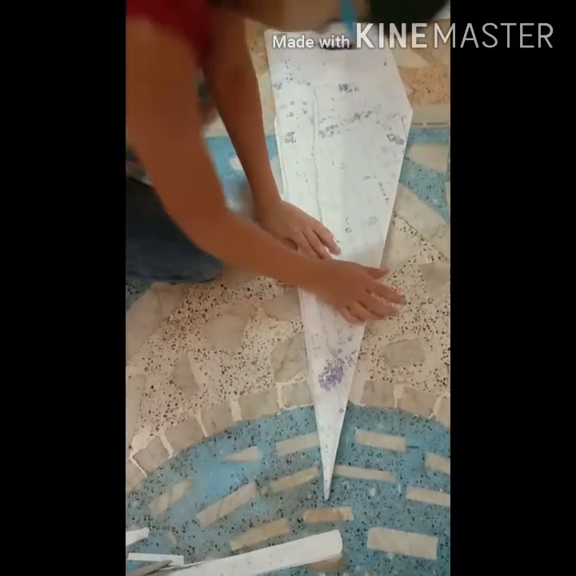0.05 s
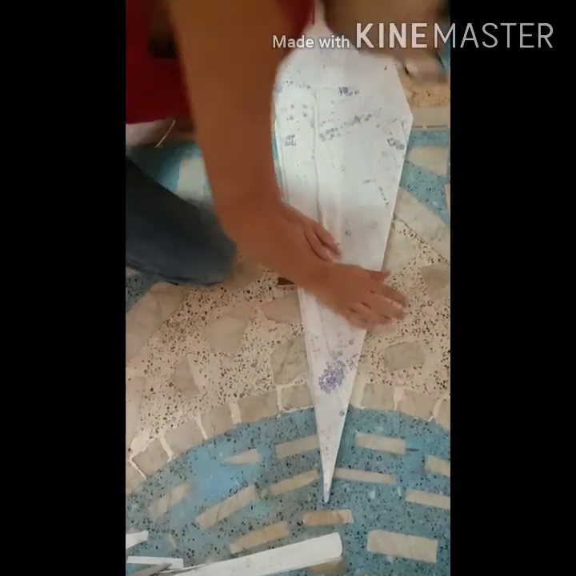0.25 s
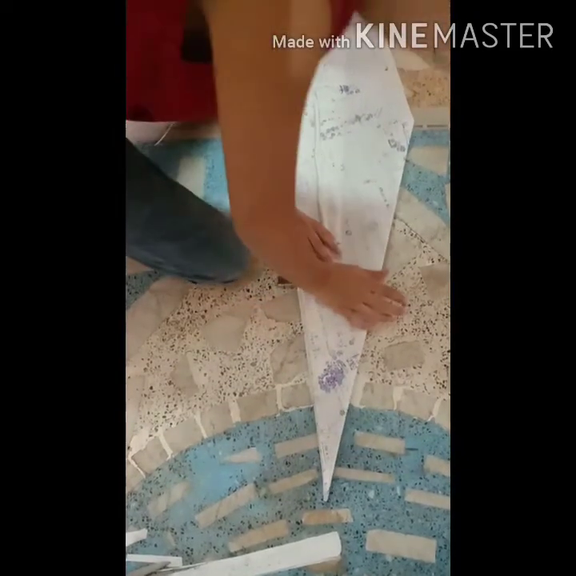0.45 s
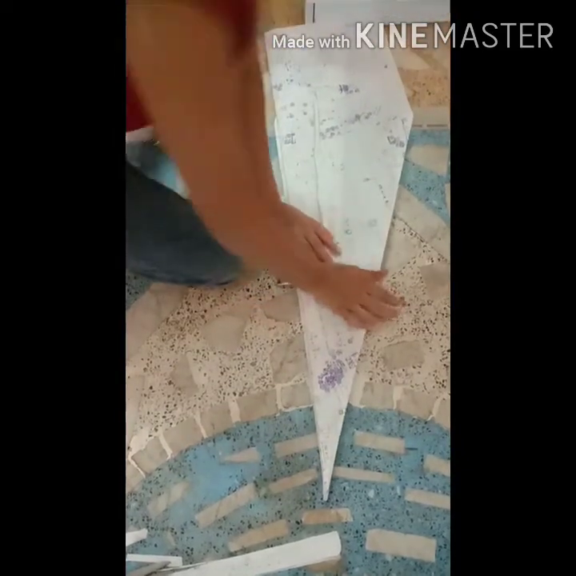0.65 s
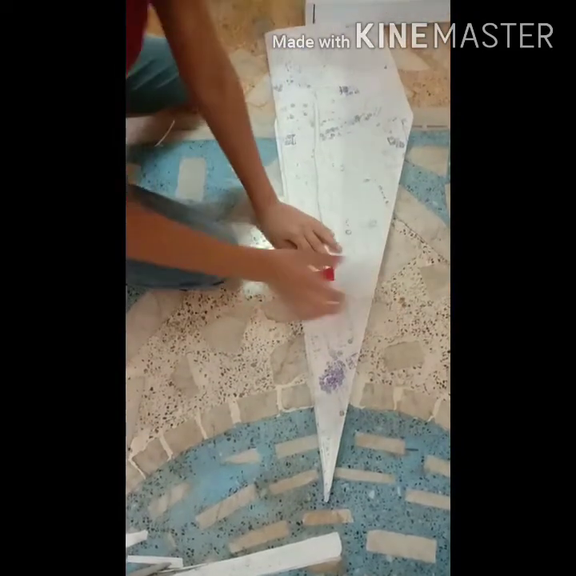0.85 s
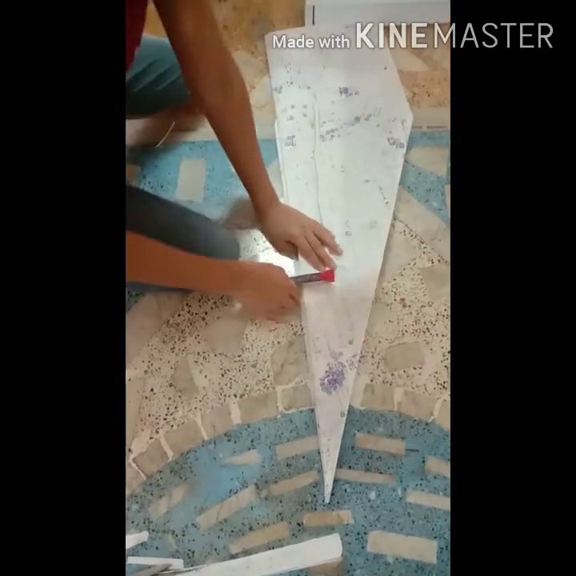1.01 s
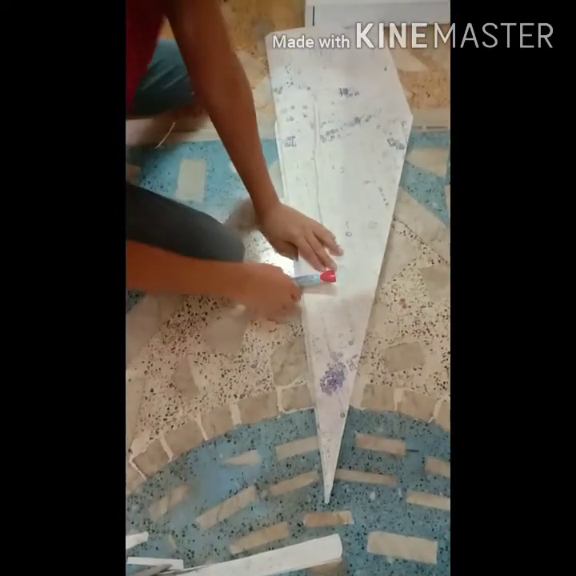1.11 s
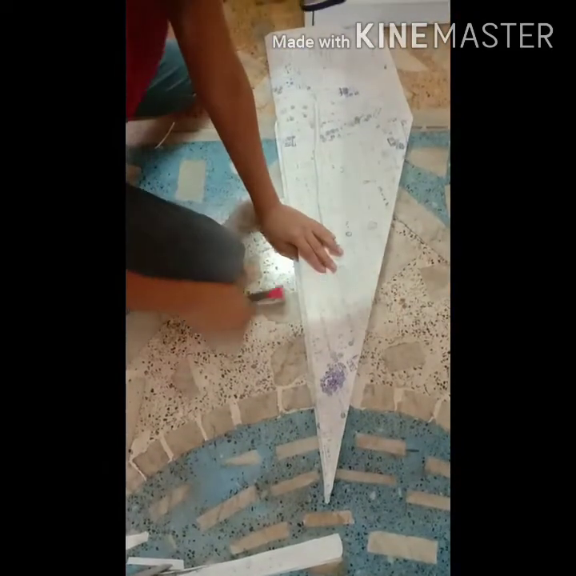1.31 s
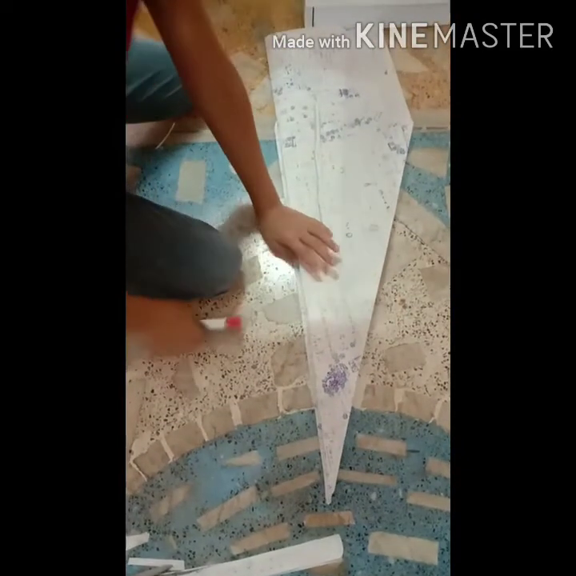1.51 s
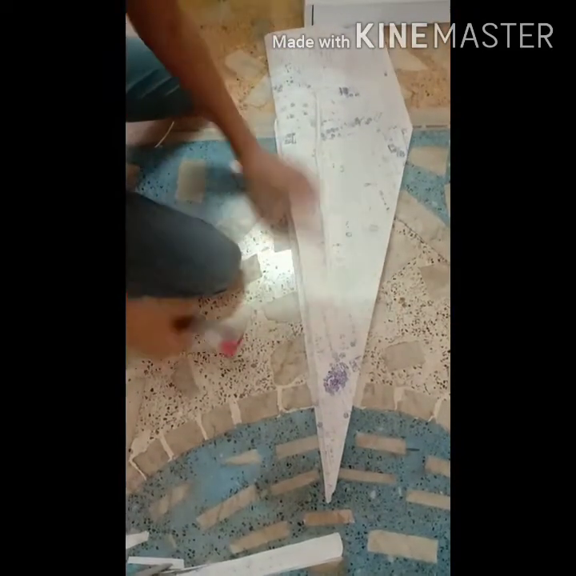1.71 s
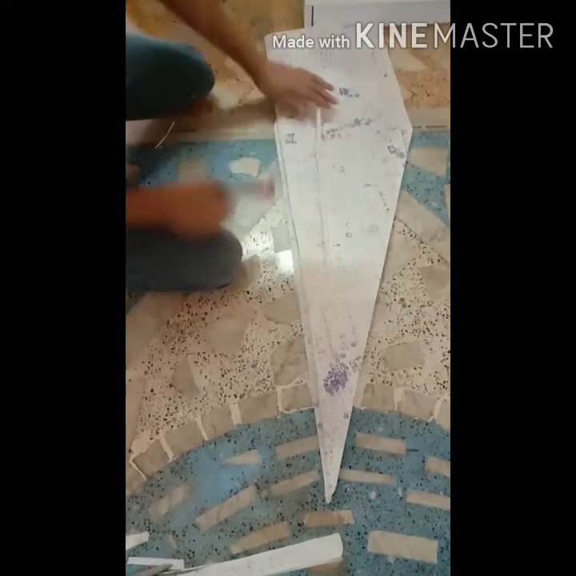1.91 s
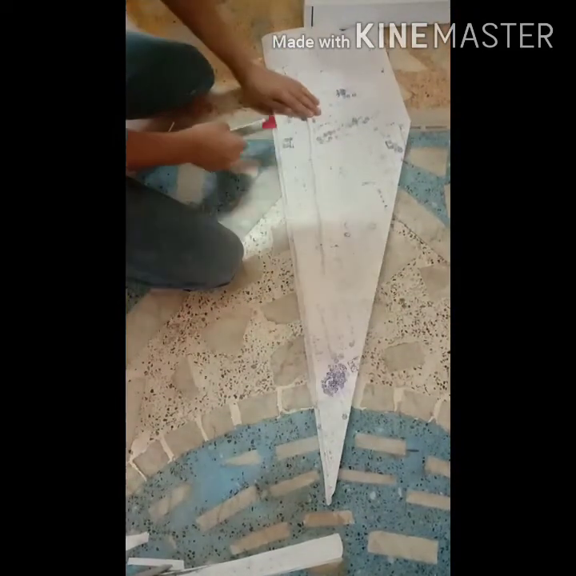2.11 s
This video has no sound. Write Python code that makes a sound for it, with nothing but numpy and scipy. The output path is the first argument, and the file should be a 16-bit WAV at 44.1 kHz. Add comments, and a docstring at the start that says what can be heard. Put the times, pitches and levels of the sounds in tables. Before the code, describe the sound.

A small hand stapler on a hard floor, close, mono, in a small boomy room. Faint dull bumps of hands and knees run throughout. At 0.2 s one loud cracking clack through paper with a low boom; lever clicks and drag from 0.3 to 0.5 s; click and scrape near 0.8; clicks at 1.2; bright ringing steel snaps at 1.36, sliding until 1.6; near quiet, then faint click and paper rub around 2.05.

```python
"""A small hand stapler on a hard floor in a small boomy room, heard at one microphone, same in both channels.
Over still air and dull bumps of hands and knees, it clacks shut once through paper: cracks over a low boom.
The lever drags and eases up with soft clicks; then the stapler scrapes off the paper, tiny slips of friction.
It springs open: bright snaps set the steel ringing, and sliding and a last rub of paper follow.
A noise suppressor pulls the quiet moments down."""
import sys
import numpy as np
from scipy import signal
from scipy.fft import rfft, irfft
from scipy.io import wavfile
from scipy.ndimage import uniform_filter1d

SR = 44100
rng = np.random.default_rng(int(sys.argv[2]) if len(sys.argv) > 2 else 0)


def wav_out(sig):
    """Save sig, one row per channel (or a flat mono array), as 16-bit PCM at SR to the path in sys.argv[1]."""
    wavfile.write(sys.argv[1], SR, np.round(np.clip(np.atleast_2d(sig).T, -1, 1) * 32767).astype(np.int16))


N = 94815  # samples, 2.15 s

# Every *_COLOUR table is a relative spectrum, scaled to energy 1 before its level is set.

# still air of the room: pitch_hz, relative level_db per Hz
AIR_COLOUR = [(20, -35.5), (40, -27.5), (60, -16), (120, -0.5), (170, -5.5), (260, -14.5), (480, -22.5),
              (600, -20), (750, -21), (1050, -25), (1270, -19.5), (1500, -29), (3000, -36), (5300, -35),
              (6500, -60), (10000, -46), (15500, -43), (17000, -58.5)]
AIR_DB = -61

# how long the room holds each band: pitch_hz, t60_s
ROOM_DECAY = [(100, 0.63), (400, .36), (1300, 0.31), (4000, 0.29), (8000, 0.27), (15000, .25)]
ROOM_GAP_S = 0.001  # silence before the first reflection
REFLECTION_DENSITY = 0.15  # share of samples that hold a reflection

# dull bumps of hands and knees on the floor: start_s, level_db, pitch_hz
FLOOR_BUMPS = [(0, -40.5, 142), (0.071, -46.5, 128), (0.134, -46.5, 134.5), (0.183, -42, 128),
               (.288, -35.5, 105.4), (.318, -37.5, 102.6), (0.412, -44.5, 99.6), (0.441, -44.5, 108.7),
               (0.476, -53, 146), (0.544, -51, 130.5), (.668, -53, 126.5), (0.788, -45.5, 117.3),
               (0.877, -50.5, 130), (0.934, -51, 110), (1.041, -53, 125), (1.108, -50.5, 127.6),
               (1.235, -56, 123), (1.283, -53, 128.6), (1.355, -50, 127), (1.414, -48.5, 111.4),
               (1.476, -53.5, 232), (1.499, -58, 127.6), (1.608, -58, 128), (1.707, -55, 123),
               (1.87, -48.5, 133.5), (1.92, -47.5, 114), (1.961, -54, 150.7), (2.004, -58, 132.5),
               (2.106, -62, 114)]
BUMP_RISE_S, BUMP_T60_S = 0.02, 0.16

# paper rubbing under the stapler and hands: time_s, level_db
PAPER_LEVEL = [(0, -73), (.39, -70.5), (.63, -80.5), (.74, -70.5), (.8, -55.5), (.83, -55), (.87, -60.5),
               (.92, -80.5), (.96, -83), (1.0, -85), (1.19, -70.5), (1.235, -53), (1.28, -63.5),
               (1.64, -87), (1.86, -81.5), (1.94, -69), (2.01, -69.5), (2.065, -55), (2.1, -71),
               (2.15, -59.5)]
# tone of the paper: pitch_hz, relative level_db per Hz
PAPER_COLOUR = [(100, -11), (400, -5), (650, 1), (1050, -7.5), (1270, 7.5), (1500, -2), (2200, -2.5),
                (3800, -7.5), (6000, -13.5), (9000, -14), (13000, -18.5), (15300, -26), (17000, -51.5)]
# steel sliding on steel: time_s, level_db
STEEL_SLIDE_LEVEL = [(.74, -76), (.752, -57.5), (.82, -50), (.92, -71.5), (1.19, -75.5), (1.24, -59),
                     (1.29, -68.5), (1.312, -63), (1.336, -52), (1.352, -62.5), (1.41, -56), (1.45, -48),
                     (1.5, -50.5), (1.528, -54.5), (1.555, -53.5), (1.59, -51.5), (1.65, -73.5)]
# tone of the sliding steel: pitch_hz, relative level_db per Hz
STEEL_SLIDE_COLOUR = [(50, -27.5), (230, 0), (400, -19), (600, -11.5), (1000, -14.5), (1270, -3.5),
                      (2000, -6), (2750, -0.5), (3100, -4), (3550, 3.5), (4400, -4), (5200, 1), (6400, -10),
                      (7300, -4.5), (8200, -16.5), (9000, -10.5), (10000, -18), (12500, -24.5),
                      (15300, -23), (17000, -43.5)]
# the lever dragging on its guide as it rises after the blow: time_s, level_db
LEVER_DRAG_LEVEL = [(.385, -99), (.405, -59), (.42, -49.5), (.455, -54.5), (.485, -60.5), (.51, -58.5),
                    (.55, -63), (.68, -65), (.76, -84)]
# tone of the dragging lever: pitch_hz, relative level_db per Hz
LEVER_DRAG_COLOUR = [(100, -16), (900, -8), (1270, 7.5), (1700, -2), (2600, -2.5), (3700, -1), (5400, -9),
                     (8000, -33), (15000, -38.5), (17000, -55)]
# unevenness of the slips, in dB
PAPER_SPREAD_DB, SLIDE_SPREAD_DB, DRAG_SPREAD_DB = 1.5, 4.5, 3
SLIPS_PER_S, FRICTION_ROOM_DB = 9000, -2
SLIP_HZ = np.arange(200, 15600, 270)  # pitches at which the tiny slips ring
SLIP_T60_S = 0.012

# soft clicks of the lever and plastic shell:
# start_s, level_db, tilt_db per octave, resonance_hz, resonance_db
LEVER_CLICKS = [(0.33, -26.5, 3.5, 4240, 14), (0.414, -25.5, -0.5, 2700, 10), (0.477, -30.5, -20, 1250, 22),
                (0.4902, -24.5, -1.5, 2010, 2), (0.4945, -18.5, -1, 1930, 8), (.6585, -36.5, -9, 1500, 8),
                (0.7184, -32.5, -11, 1550, 20), (0.746, -31.5, 3.5, 4060, 7), (0.7869, -18, 7, 5650, 2.5),
                (0.7876, -27, 1, 1300, 2), (.821, -24, 6.5, 1250, 9.5), (1.209, -27, 2, 2000, 21),
                (1.216, -26.5, 0, 1950, 14), (1.2215, -18.5, 9.5, 2100, 26.5), (1.31, -37.5, 4, 4160, 15),
                (1.5334, -27, 2.5, 2806, 20.5), (2.028, -37, -2.5, 1250, 23), (2.0472, -30, 2.5, 1280, 17),
                (2.064, -52, 0, 1290, 20)]
# tone of the clicks: pitch_hz, relative level_db per Hz
LEVER_CLICK_COLOUR = [(60, 4.5), (400, -15.5), (900, -10.5), (1250, 13), (1700, 2), (3700, -2.5),
                      (6000, -7.5), (9000, -14.5), (13000, -24), (15300, -32), (17000, -51)]
CLICK_CHATTER_T60_S, CLICK_ROOM_DB = 0.039, -6

# the steel magazine snapping free and rattling: start_s, level_db, ring_db (against the snap)
MAGAZINE_SNAPS = [(1.3565, -12.5, -15), (1.3612, -12, -3), (1.3647, -15, -22), (1.3663, -14, -0.5),
                  (1.3666, -17, 2.5), (1.4563, -18, -23), (1.5321, -24.5, -10)]
# tone of the snaps: pitch_hz, relative level_db per Hz
MAGAZINE_SNAP_COLOUR = [(40, -29), (120, 12), (250, -9.5), (550, -3), (950, -24.5), (1300, -8.5),
                        (1750, -3), (2500, -6), (3700, 6.5), (4300, -5.5), (4750, 3), (6200, -4.5),
                        (7600, 2), (8800, -5.5), (11000, -10), (12000, -0.5), (13200, -16), (15300, -4),
                        (17000, -38.5)]
# ringing of steel magazine and spring: pitch_hz, relative level_db, t60_s
STEEL_MODES = [(245, -6.5, 0.15), (414, -11, 0.13), (587, -16, 0.16), (3490, -1, 0.35), (3520, 0, 0.12),
               (3680, -5, 0.2), (3895, 4.5, 0.087), (4737, -9, .16), (5520, -17, 0.2), (7607, -8.5, 0.21),
               (9800, -19, .25), (9650, -27, 0.21)]
SNAP_CHATTER_T60_S, SNAP_ROOM_DB = 0.015, -4

# the staple punching through and the jaw landing: start_s, level_db, resonance_hz, resonance_db
CLACK_BLOWS = [(0.2083, 2.5, 2650, 3), (0.212, -7, 3400, 2), (0.2213, -5, 3700, 4.5)]
# tone of the cracks: pitch_hz, relative level_db per Hz
CLACK_TONE = [(30, -29), (120, 0), (250, -1), (400, -6.5), (550, -4.5), (950, -7), (1600, -3), (2500, -1),
              (3100, -5.5), (3700, -2), (4400, -13), (5300, -7), (6200, -16), (7100, -8), (7750, -13.5),
              (8250, -7), (9000, -16.5), (10500, -15.5), (13000, -21.5), (15300, -17), (17000, -45.5)]
# stapler body and floor under the blow: pitch_hz, level_db, t60_s
BODY_MODES = [(108.5, -15, .16), (128, -52, 0.33), (204.3, -37.5, 0.27), (232, -28.5, 0.13), (315, -38, .3),
              (504.7, -33.5, 0.091), (594, -34, .17), (652, -39, 0.19), (824, -39.5, 0.15),
              (1285, -34, 0.2), (1927, -42.5, 0.1), (2170, -36, .14), (3440, -40, .2), (3636, -35, .2)]
CLACK_CHATTER_T60_S, CLACK_ROOM_DB = 0.007, -2
BODY_RISE_S, BODY_LAG_S = 0.008, 0.004  # lag after the first crack

# shared by all strikes
CONTACT_T60_S = 0.0036
RESONANCE_OCTAVES = 0.26
EVEN_SHARE = 0.65  # 0 leaves a burst's spectrum alone, 1 makes it flat

# suppressor: threshold in dB, dB of cut per dB below it, deepest cut in dB
QUIET_DB, QUIET_SLOPE, QUIET_MAX_DB = -50, 0.73, 9
# microphone and case colour: pitch_hz, gain_db
MIC_RESPONSE = [(20, -1), (10500, -2), (12300, -5.5), (13400, -4.5), (14300, -3.5), (15200, 1),
                (16500, -3.5)]
# narrow resonance of the microphone housing, added to everything the microphone hears
CASE_HZ, CASE_WIDTH_HZ, CASE_GAIN = 1253, 30, 1.1
EDGE_HZ = 15600  # top of the band


def amp(db):
    """Decibels to gain."""
    return 10 ** (np.asarray(db) / 20)


def unit(x):
    """Scales to energy 1."""
    return x / np.sqrt(np.sum(x ** 2) + 1e-20)


def read(points, hz):
    """Reads a table on a log-frequency axis."""
    f, value = np.transpose(points)
    return np.interp(np.log(hz + 1), np.log(f + 1), value)


def add(mix, s, sound):
    """Mixes a sound in at a time in seconds."""
    part = mix[max(round(s * SR), 0):][:len(sound)]
    part += sound[:len(part)]


def pulse(colour, tilt_db=0, centre_hz=1000, peak_db=0, size=4096):
    """Causal pulse of energy 1 with a spectrum, a tilt and one broad resonance."""
    hz = abs(np.fft.fftfreq(size, 1 / SR))
    octaves = np.log2(np.maximum(hz, 500) / centre_hz)
    resonance_db = peak_db * np.exp(-(octaves / RESONANCE_OCTAVES) ** 2)
    db = read(colour, hz) + tilt_db * octaves + resonance_db
    # minimum phase: the energy comes as early as the spectrum allows
    spectrum = np.exp(np.conj(signal.hilbert(np.log(amp(db)))))
    return unit(np.fft.ifft(spectrum).real[:size // 2])


def flatten(x):
    """Evens out a burst's spectrum, peaks and holes alike, at energy 1."""
    z = rfft(x, 2 * len(x))
    return unit(irfft(z / (abs(z) + 1e-9) ** EVEN_SHARE)[:len(x)])


def reflections(size=256):
    """Dense room reflections of energy 1, each band dying at its own speed."""
    time = np.arange(SR // 2) / SR
    present = (rng.random(len(time)) < REFLECTION_DENSITY) * (time > ROOM_GAP_S)
    taps = rng.standard_normal(len(time)) * present
    hz, t, z = signal.stft(taps, SR, nperseg=size)
    decay = amp(-60 * t / read(ROOM_DECAY, hz)[:, None])
    return unit(signal.istft(z * decay, SR, nperseg=size)[1])


def room(x, wet_db):
    """A sound together with its reflections."""
    return x + amp(wet_db) * signal.fftconvolve(x, reflections())[:N]


def strike(shape, chatter_t60_s, chatter, wet_db, size=2048):
    """A brief crunch of contact and a dense chatter, over the room's answer to the pulse."""
    t = np.arange(size) / SR
    crunch, rattle = rng.standard_normal((2, size))
    crunch = unit(crunch * amp(-60 * t / CONTACT_T60_S))
    rattle = unit(rattle * amp(-60 * t / chatter_t60_s))
    force = flatten(crunch + chatter * rattle)
    out = amp(wet_db) * signal.fftconvolve(reflections(), shape)
    add(out, 0, unit(signal.fftconvolve(force, shape)))
    return out


def ring(modes):
    """Sum of sines dying exponentially, each by its own t60."""
    t = np.arange(SR // 2) / SR
    return sum(amp(db - 60 * t / t60) * np.sin(2 * np.pi * hz * t) for hz, db, t60 in modes)


def air():
    """Steady low room noise: white noise shaped by the air's spectrum."""
    return amp(AIR_DB) * signal.fftconvolve(rng.standard_normal(N), pulse(AIR_COLOUR))[:N]


def bumps():
    """Soft pushes on the floor that wake the room's low boom, one swelling and dying sine each."""
    out, t = np.zeros(N), np.arange(SR // 3) / SR
    shape = (1 - np.exp(-(t / BUMP_RISE_S) ** 2)) * amp(-60 * t / BUMP_T60_S)
    for s, db, hz in FLOOR_BUMPS:
        add(out, s, amp(db) * shape / shape.max() * np.sin(2 * np.pi * hz * t))
    return out


def friction(level, colour, spread_db):
    """Many tiny slips of uneven size under a stroke, each ringing briefly at its own pitch."""
    size = amp(spread_db * np.minimum(rng.exponential(1, N), 3))
    happens = rng.random(N) < SLIPS_PER_S / SR
    slips = rng.standard_normal(N) * size * happens
    which = rng.integers(0, len(SLIP_HZ), N)
    t = np.arange(SR // 50) / SR
    decay = amp(-60 * t / SLIP_T60_S)
    grains = np.zeros(N)
    for k, hz in enumerate(SLIP_HZ):
        grains += signal.oaconvolve(slips * (which == k), np.cos(2 * np.pi * hz * t) * decay)[:N]
    sound = room(signal.fftconvolve(grains, pulse(colour))[:N], FRICTION_ROOM_DB)
    stroke = amp(np.interp(np.arange(N) / SR, *np.transpose(level)))
    return np.sqrt(N) * unit(sound) * stroke  # RMS 1 before the stroke


def rubbing():
    """Rubbing paper, sliding steel and the dragging lever, all stick-slip friction."""
    paper = friction(PAPER_LEVEL, PAPER_COLOUR, PAPER_SPREAD_DB)
    slide = friction(STEEL_SLIDE_LEVEL, STEEL_SLIDE_COLOUR, SLIDE_SPREAD_DB)
    drag = friction(LEVER_DRAG_LEVEL, LEVER_DRAG_COLOUR, DRAG_SPREAD_DB)
    return paper + slide + drag


def lever():
    """Soft plastic clicks as the grip eases and shifts, each a strike with its own resonance."""
    out = np.zeros(N)
    for s, db, tilt_db, hz, peak_db in LEVER_CLICKS:
        shape = pulse(LEVER_CLICK_COLOUR, tilt_db, hz, peak_db)
        add(out, s, amp(db) * strike(shape, CLICK_CHATTER_T60_S, chatter=1.66, wet_db=CLICK_ROOM_DB))
    return out


def magazine():
    """Bright snaps that set the modes of the steel ringing."""
    out, steel = np.zeros(N), unit(ring(STEEL_MODES))
    for s, db, ring_db in MAGAZINE_SNAPS:
        shape = pulse(MAGAZINE_SNAP_COLOUR)
        add(out, s, amp(db) * strike(shape, SNAP_CHATTER_T60_S, chatter=1.6, wet_db=SNAP_ROOM_DB))
        add(out, s, amp(db + ring_db) * steel)
    return out


def clack():
    """The stapling blow: hard cracks, then the modes of body and floor boom."""
    out, boom = np.zeros(N), ring(BODY_MODES)
    for s, db, hz, peak_db in CLACK_BLOWS:
        shape = pulse(CLACK_TONE, 0, hz, peak_db)
        add(out, s, amp(db) * strike(shape, CLACK_CHATTER_T60_S, chatter=0.7, wet_db=CLACK_ROOM_DB))
    t = np.arange(len(boom)) / SR
    swell = 1 - np.exp(-(t / BODY_RISE_S) ** 2)
    add(out, CLACK_BLOWS[0][0] + BODY_LAG_S, boom * swell)
    return out


def scene():
    """All sources at one microphone, the same in both channels."""
    mono = air() + bumps() + rubbing() + lever() + magazine() + clack()
    return np.array([mono, mono])


def record(dry):
    """A suppressor lowers the quiet moments; then housing resonance, microphone colour and band limit."""
    power = uniform_filter1d(dry[0] ** 2, size=900)  # about 20 ms
    power_db = 10 * np.log10(abs(power) + 1e-12)
    cut_db = np.clip((QUIET_DB - power_db) * QUIET_SLOPE, 0, QUIET_MAX_DB)
    out = dry * amp(-uniform_filter1d(cut_db, size=600))
    housing = signal.iirpeak(CASE_HZ, CASE_HZ / CASE_WIDTH_HZ, fs=SR)
    out = out + CASE_GAIN * signal.lfilter(*housing, out)
    mic_gain = amp(read(MIC_RESPONSE, np.fft.rfftfreq(2 * N, 1 / SR)))
    out = irfft(rfft(out, 2 * N) * mic_gain)[:, :N]
    low_pass = signal.firwin(401, EDGE_HZ, window=("kaiser", 9), fs=SR)
    return signal.oaconvolve(out, low_pass[None], "same")


dry = scene()
out = record(dry)
wav_out(out)
```